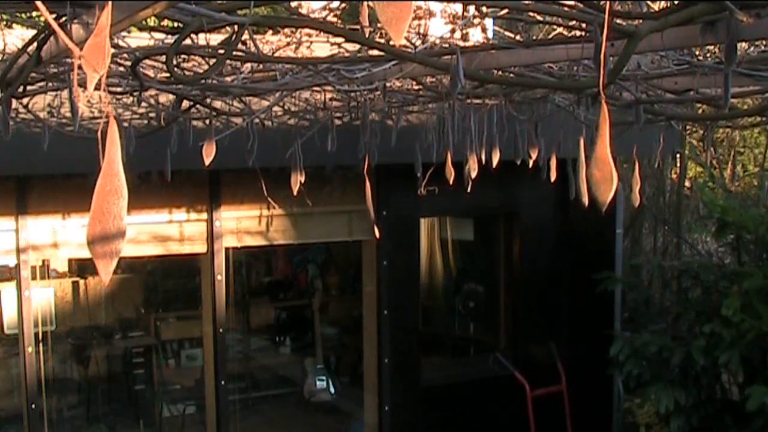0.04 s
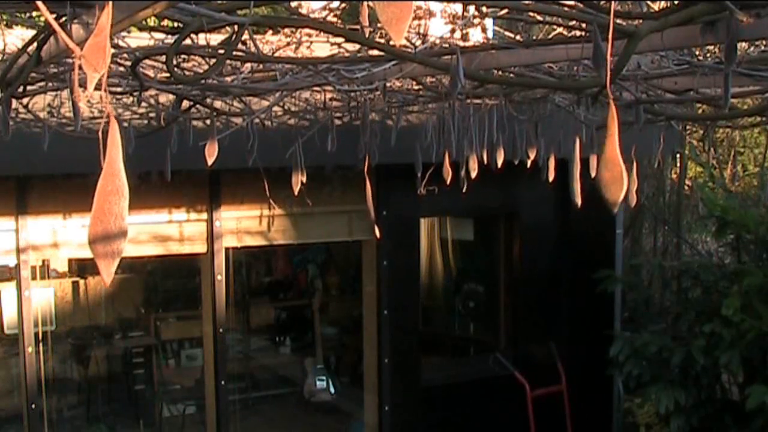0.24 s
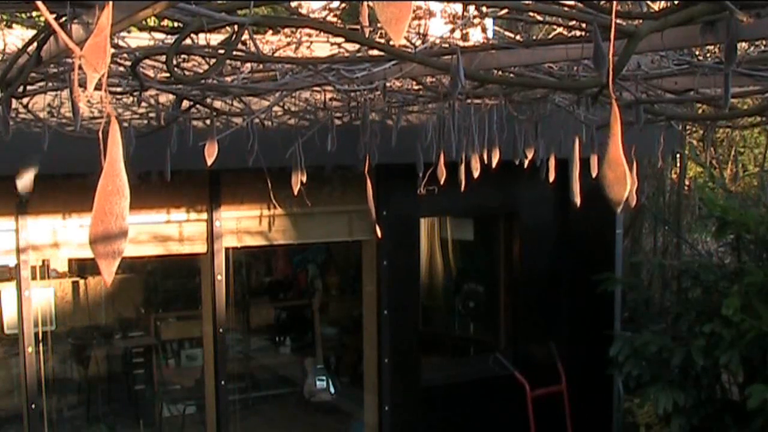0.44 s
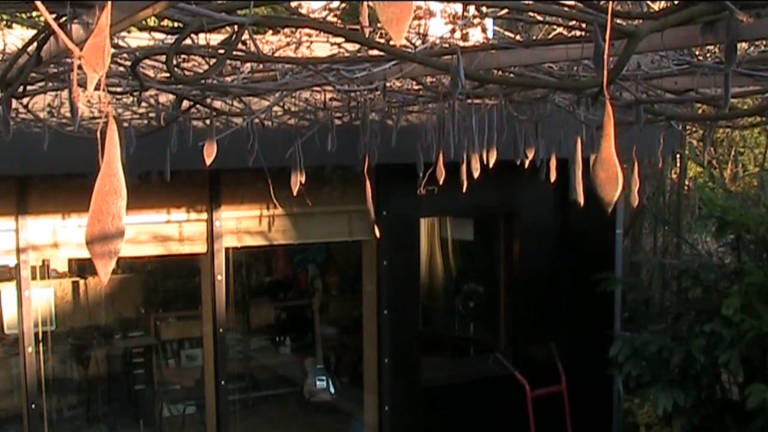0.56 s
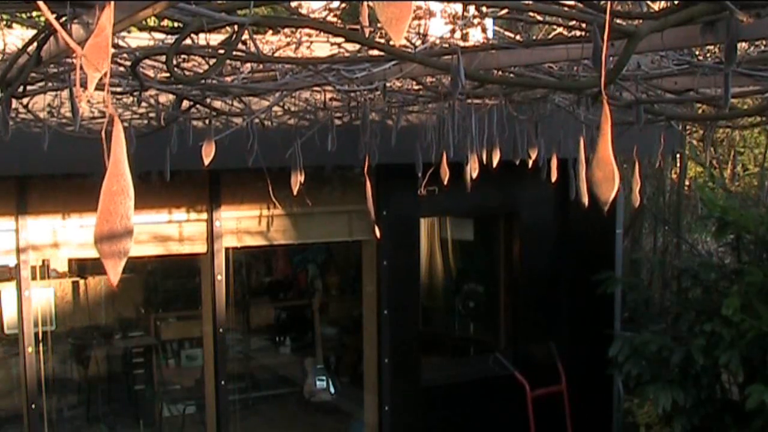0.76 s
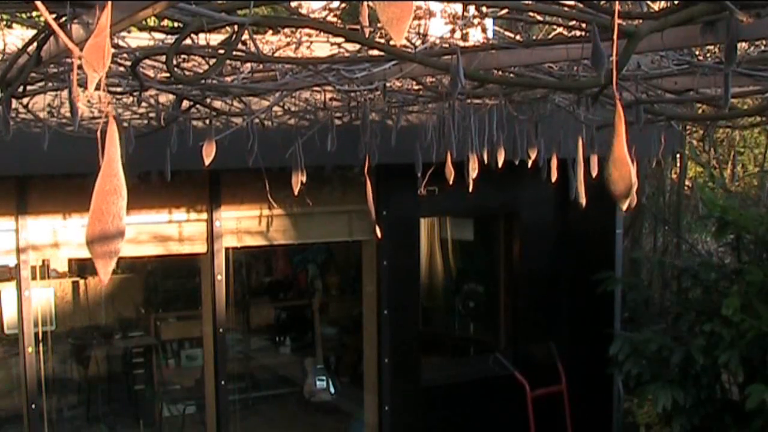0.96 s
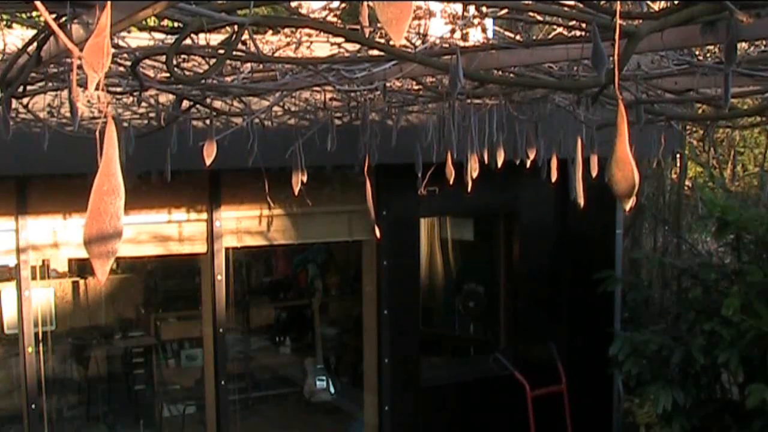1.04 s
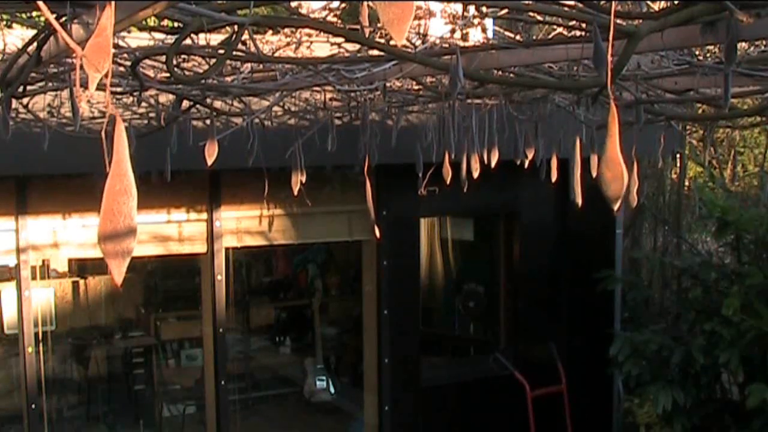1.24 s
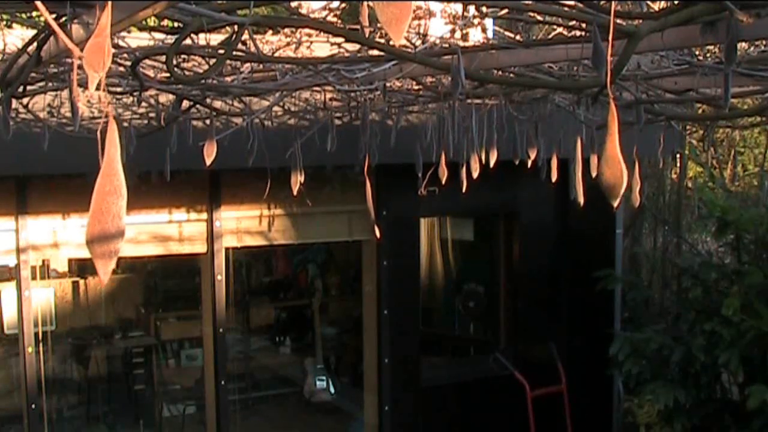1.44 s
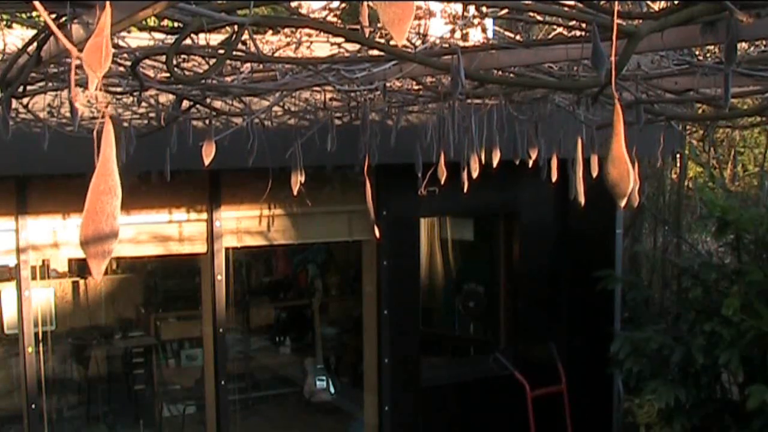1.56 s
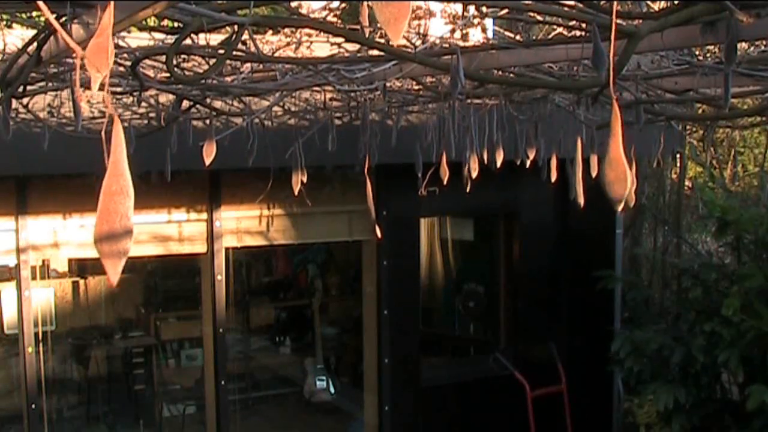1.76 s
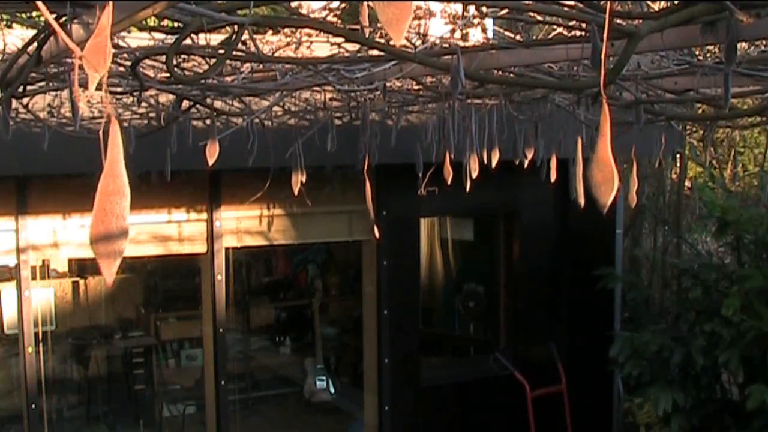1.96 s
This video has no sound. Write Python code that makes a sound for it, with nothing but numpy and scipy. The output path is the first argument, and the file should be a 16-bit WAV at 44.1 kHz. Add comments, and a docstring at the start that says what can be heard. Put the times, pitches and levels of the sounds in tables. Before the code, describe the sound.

Dry seed pods burst under a pergola in a few sharp, close cracks with quick echoes. Seeds and husks then tick and knock on beams and ground, while a light breeze rumbles on the microphone.

```python
"""A light breeze rumbles on the microphone over a soft hush, and a far bird calls twice.
From 0.3 s dry seed pods burst under a pergola beside a house, each a snap of tearing fibres.
Roof and wall throw every crack back, and the nearest cracks overload the microphone.
Seeds and husks then knock on beams and tick on the ground, some ringing briefly.
The rumble is loudest at 1.3 s; the last cracks come near 1.6 s and a few more ticks follow."""
import sys
import numpy as np
from scipy import signal
from scipy.fft import rfft, irfft
from scipy.io import wavfile
from scipy.ndimage import uniform_filter1d

SR = 44100
rng = np.random.default_rng(int(sys.argv[2]) if len(sys.argv) > 2 else 0)


def to_wav(sig):
    """Store sig (one row per channel, or 1-D mono) as 16-bit WAV at the path in sys.argv[1].

    Samples outside -1..1 are clipped; the rate is SR.
    """
    pcm = np.clip(np.atleast_2d(sig), -1, 1) * 32767
    pcm = np.round(pcm).astype(np.int16)
    wavfile.write(sys.argv[1], SR, pcm.T)  # frames by channels


N = 88200

# tone of the outdoor hush (frequency [Hz], relative level [dB])
AIR_TONE = [(180, -32), (300, -2), (447, -4.5), (1810, -16.5), (3290, -23.5), (13500, -39)]
# tone of the wind (frequency [Hz], relative level [dB])
WIND_TONE = [(20, -7.5), (45, -1.5), (110, 0), (200, -7.5), (330, -19), (700, -29)]
# how alike the wind is left and right (frequency [Hz], likeness [-1 to 1])
WIND_LIKENESS = [(30, 0.81), (130, -0.23), (400, -0.31)]
# level of the low wind rumble, which dips just after the first loud crack (time [s], level [dB])
RUMBLE_LEVELS = [(0, -35.5), (.3, -32.5), (.37, -44.5), (.54, -35), (1.05, -28.5), (1.301, -22), (1.7, -31),
                 (2, -34.5)]
# swirls of air hitting the microphone (time [s], level [dB], centre [Hz])
WIND_SWIRLS = [(0.21, -23, 99), (.24, -26, 105), (.817, -29.5, 172), (0.885, -25.5, 113), (.94, -24, 108.5),
               (1.017, -24.5, 147), (1.245, -21.5, 90.5), (1.345, -25.5, 228), (1.483, -24, 86),
               (1.605, -27.5, 129), (1.65, -29.5, 164), (1.719, -23.5, 100), (1.752, -27, 167),
               (1.913, -28.5, 111)]
# far bird calls (time [s], length [s], start pitch [Hz], end pitch [Hz], level [dB])
BIRD_CALLS = [(-.06, .21, 4440, 2817, -38), (0.285, 0.081, 4570, 4380, -39.5)]
# how long the yard echoes (frequency [Hz], time to fade 60 dB [s])
YARD_FADE = [(300, 0.97), (1500, 0.42), (3500, 0.48), (7000, 0.28), (15000, 0.11)]
# how alike the echoes are left and right (frequency [Hz], likeness [0 to 1])
ECHO_LIKENESS = [(300, 1), (1200, 0.88), (2500, 0.5), (4500, 0.34), (8000, 0.18), (14000, 0)]
# struck husks and beams (time [s], pitch [Hz], level [dB], time to fade 60 dB [s])
RINGING_PARTS = [(.4735, 4130, -17.5, 0.012), (.4740, 772, -16, 0.043), (.5030, 2090, -11.5, 0.045),
                 (.7320, 1960, -19, 0.019), (1.0554, 6916, -2.5, 0.11), (1.0554, 2017, -16.5, 0.033),
                 (1.1472, 841, -17, 0.073), (1.1565, 1800, -21.5, 0.11), (1.1565, 6740, -10.5, 0.06),
                 (1.1697, 3367, -12, 0.067), (1.5771, 6385, -10.5, 0.045), (1.5771, 1772, -20.5, 0.035),
                 (0.8427, 3260, -29, .02)]
# tone of a dry husk (frequency [Hz], relative level [dB])
HUSK_TONE = [(100, -1.5), (400, 3), (800, -0.5), (1600, 2), (4200, 0), (5300, -1), (7000, 3), (11000, 1.5),
             (15500, 6)]
# loud cracks and their close, sharp echoes (time [s], level [dB], peak [Hz],
# fall below the peak [dB/octave], fall above it [dB/octave], tearing time [s], echo [dB])
CRACKS_AND_ECHOES = [(0.332, 12, 3550, 9.5, 12.5, 0.00096, -5.5), (0.3414, 5, 2320, 11, 8.5, 0.001, -5.5),
                     (0.345, -2, 3000, 8.5, 15, .0005, -5), (0.3532, 2.5, 3500, 12, 14.5, 0.00043, -2.5),
                     (0.4971, -5.5, 5540, 1, 12, 0.0016, -5.5), (0.5008, -5.5, 6800, 2.5, 22, 0.0012, -3.5),
                     (.5030, -2, 3100, 12, 9.5, 0.0014, -6), (0.5079, -5.5, 3380, 5.5, 10, 0.0014, -1.5),
                     (1.0553, 4, 5820, 8.5, 13.5, 0.0023, 1.5),
                     (1.5755, -4, 8700, 12.5, 11.5, 0.00084, -11.5),
                     (1.577, -0.5, 8530, 7, 15.5, 0.00084, -2.5)]
# seeds and husks landing (same columns as CRACKS_AND_ECHOES)
LANDINGS = [(.4735, -15.5, 9100, 0.17, 2.5, 0.0027, 6), (0.7381, -21, 6130, 0.55, 10.6, 0.0014, 1.5),
            (0.7454, -25, 4960, 0.48, 14, 0.0004, 1), (0.842, -14, 7900, 1.4, 5, 0.0012, -3.5),
            (0.9306, -18, 7500, 13, 10, 0.00081, -7), (1.1472, 0, 14100, 3.7, 3.5, 0.0011, -3.5),
            (1.1565, -5.5, 6500, 7.4, 10.4, 0.00098, -2), (1.1691, -13, 3640, 11, 5.4, 0.0029, 3.5),
            (1.3884, -20, 7100, 2.2, 9.4, 0.0003, 4.5), (1.4164, -22.5, 6260, 0.3, 6.2, 0.0025, 8),
            (1.5548, -29.5, 3090, 6.5, 15.4, 0.0028, 10.5), (1.7368, -16.5, 3820, 8.5, 12.3, 0.0012, -1),
            (1.7427, -22, 4140, 6.1, 16, 0.0013, -0.5), (1.8132, -33, 4960, 5.4, 12, 0.00095, 1.5)]

WIND_LEFT_DB, DIRECT_LEFT_DB = 4, 1.6  # how much louder the left side is


def amp(db):
    """Turns decibels into a gain."""
    return 10 ** (np.asarray(db) / 20)


def unit(x):
    """Scales a sound to an average (rms) strength of 1."""
    return x / np.sqrt(np.mean(x ** 2) + 1e-20)


def packed(sound, level_db):
    """Gives a short sound the energy of level_db held for half a millisecond."""
    return amp(level_db) * sound * np.sqrt(0.0005 * SR / np.sum(sound ** 2))


def lean_left(db):
    """Two gains that make the left side db louder than the right."""
    return amp([[db / 2], [-db / 2]])


def axes(size):
    """The times and frequencies of a sound that is size samples long."""
    return np.arange(size) / SR, np.fft.rfftfreq(size, 1 / SR)


def read(points, hz):
    """Reads between a table's rows on a log-frequency scale."""
    f, value = np.transpose(points)
    return np.interp(np.log(hz + 1), np.log(f + 1), value)


def add(mix, time_s, sound):
    """Mixes a stereo sound in, cutting off what falls outside."""
    at = round(time_s * SR)
    part = mix[:, max(at, 0):]
    sound = sound[:, max(-at, 0):][:, :part.shape[1]]
    part[:, :sound.shape[1]] += sound


def causal(gain_db):
    """A filter with these gains that never sounds before it is struck (minimum phase)."""
    log_gain = np.log(amp(np.maximum(gain_db, -100)))
    mirrored = np.r_[log_gain, log_gain[-2:0:-1]]
    return np.exp(np.conj(signal.hilbert(mirrored)))[:len(gain_db)]


def noise_pair(gain, likeness, size):
    """Left and right noise, partly alike, with its tone set by gain."""
    left, other = rfft(rng.standard_normal((2, size)))
    right = likeness * left + np.sqrt(1 - likeness ** 2) * other
    return unit(irfft(np.array([left, right]) * gain, size))


def air(level_db=-44):
    """A quiet, steady outdoor hush."""
    _, hz = axes(N)
    return amp(level_db) * noise_pair(amp(read(AIR_TONE, hz)), likeness=0.37, size=N)


def breeze():
    """Wind on the microphone: a low rumble whose level rises and dips."""
    t, hz = axes(N)
    when, level_db = np.transpose(RUMBLE_LEVELS)
    tone = amp(read(WIND_TONE, hz)) / (1 + (hz / 800) ** 4)
    rumble = noise_pair(tone, read(WIND_LIKENESS, hz), N)
    return rumble * amp(np.interp(t, when, level_db)) * lean_left(WIND_LEFT_DB)


def swirl(level_db, centre_hz, length_s=0.046, width_octaves=0.54):
    """A swirl of air hits the microphone with a short, soft thump."""
    size = int(length_s * SR)
    _, hz = axes(size)
    hump = 1 / (1 + (np.log2((hz + 1) / centre_hz) / width_octaves) ** 2)
    tone = hump / (1 + (hz / (4 * centre_hz)) ** 4)
    puff = noise_pair(tone, read(WIND_LIKENESS, hz), size) * np.hanning(size)
    return amp(level_db) * unit(puff) * lean_left(WIND_LEFT_DB)


def bird(length_s, start_hz, end_hz, level_db, width_hz=1070):
    """A hoarse falling whistle, blurred by distance."""
    size = int(length_s * SR)
    _, hz = axes(size)
    blur = noise_pair(1 / (1 + (2 * hz / width_hz) ** 2), likeness=0.45, size=size)
    pitch = np.geomspace(start_hz, end_hz, size)
    whistle = np.sin(2 * np.pi * np.cumsum(pitch) / SR)
    return amp(level_db) * unit(blur * whistle) * np.hanning(size)


def pergola(size, build_s=0.00295, hold_s=0.0058, fade_s=0.2, yard_db=-13):
    """Echoes at one spot: quick ones from roof and wall, then a faint tail from the yard."""
    t, hz = axes(size)
    dull = 1 / np.hypot(1, (hz / 13500) ** 2)  # thatch and vines soak up the top treble
    early, yard = (noise_pair(dull, read(ECHO_LIKENESS, hz), size) for _ in range(2))
    wall_slap = 1 + amp(-2.5) * np.exp(-((t - 0.017) / 0.0032) ** 2)  # arrives after 17 ms
    early *= wall_slap * np.minimum(t / build_s, 1) ** 2
    early *= amp(-60 * np.maximum(t - hold_s, 0) / fade_s)
    band_hz, when, bands = signal.stft(yard, SR, nperseg=256)
    bands *= amp(-60 * when / read(YARD_FADE, band_hz)[:, None])  # low notes last longest
    yard = signal.istft(bands, SR, nperseg=256)[1][:, :size] * np.minimum(t / hold_s, 1)
    return (unit(early) + amp(yard_db) * unit(yard)) / np.sqrt(2 * size)


def heard(direct, spread, echo_db, size=32768):
    """The direct sound reaches the microphone; the sound spread all around returns as echoes."""
    _, hz = axes(size)
    lag_s = 0.00002 * (1 + hz / 24300)  # the right side hears it later, more so in the treble
    delay = np.exp(-2j * np.pi * hz * lag_s)
    stereo = irfft(rfft(direct, size) * np.array([np.ones(len(hz)), delay]))
    echoes = signal.fftconvolve(spread[None], pergola(size), axes=1)[:, :size]
    fade = np.minimum(1, 2 * np.linspace(1, 0, size)) ** 2
    return (stereo + amp(echo_db) * echoes) * fade * lean_left(DIRECT_LEFT_DB)


def ring(pitch_hz, level_db, fade_s, rise_s=0.00095, rattle_depth=1.8, rattle_hz=130, size=16384):
    """A struck husk or beam rings with one dying note, made rough by rattling."""
    t, hz = axes(size)
    a, b = rattle_depth * noise_pair(1 / (1 + (hz / rattle_hz) ** 2), likeness=0, size=size)
    rattle = 1 + a + 1j * b  # shakes both loudness and pitch
    note = (rattle * np.exp(2j * np.pi * pitch_hz * t)).imag
    envelope = amp(-60 * t / fade_s) * (1 - np.exp(-t / rise_s))
    note = packed(note * envelope, level_db)
    return heard(note, note, echo_db=-1.5)


def crack(level_db, peak_hz, fall_below, fall_above, tear_s, echo_db, size=4096):
    """A pod's crack, its sharp echo or a landing: a snap and a dying crackle, toned by the husk."""
    t, hz = axes(size)
    fibres, uneven = rng.standard_normal((2, size))
    uneven_db = unit(uniform_filter1d(uneven, size=12))  # the tearing wavers by about 1 dB
    burst = fibres * amp(uneven_db) * np.exp(-t / tear_s)
    burst[0] = 4.6  # the first snap
    octaves = np.log2((hz + 20) / peak_hz)
    distance = np.hypot(octaves, 0.037)  # octaves from the peak, with a rounded tip
    fall_db = fall_below * (distance - octaves) / 2 + fall_above * (distance + octaves) / 2
    husk = causal(read(HUSK_TONE, hz) - fall_db)
    direct = packed(irfft(rfft(burst) * husk), level_db)
    spread = packed(irfft(husk), level_db)
    return heard(direct, spread, echo_db)


def scene():
    """Lays cracks, rings, swirls and bird calls over the breeze and the hush."""
    mix = breeze() + air()
    for source, table in ((crack, CRACKS_AND_ECHOES + LANDINGS), (ring, RINGING_PARTS),
                          (swirl, WIND_SWIRLS), (bird, BIRD_CALLS)):
        for time_s, *row in table:
            add(mix, time_s, source(*row))
    return mix


def record(dry):
    """The microphone clips the loudest cracks, then the treble above 16 kHz is cut."""
    clipped = np.clip(dry, -1, 1)
    low_pass = signal.firwin(255, 16000, window=("kaiser", 8), fs=SR)
    return signal.oaconvolve(clipped, low_pass[None], "same")


dry = scene()
out = record(dry)
to_wav(out)
```